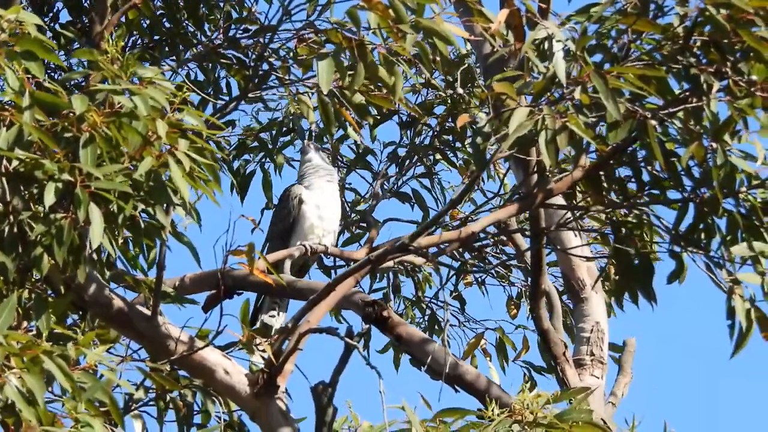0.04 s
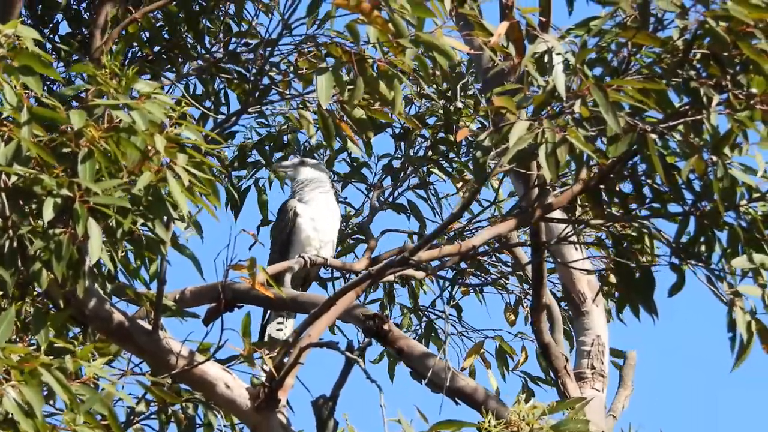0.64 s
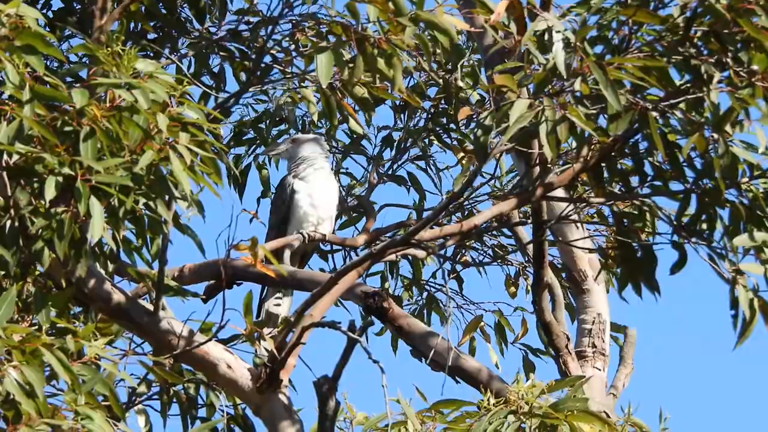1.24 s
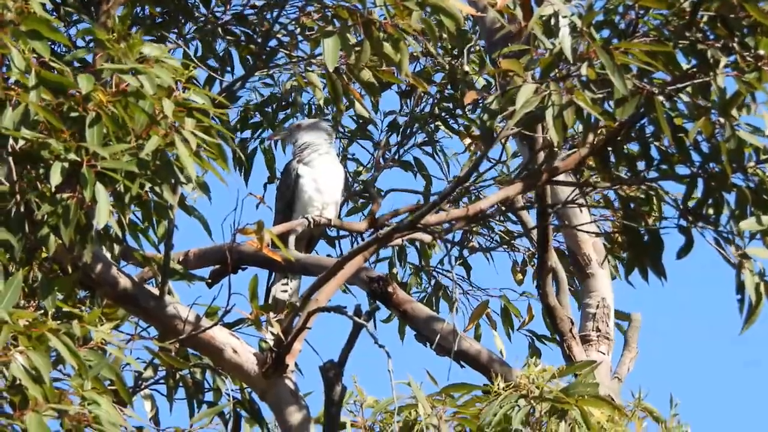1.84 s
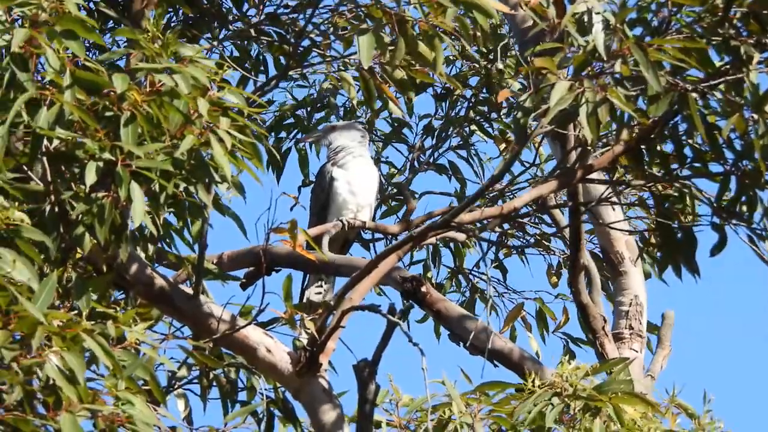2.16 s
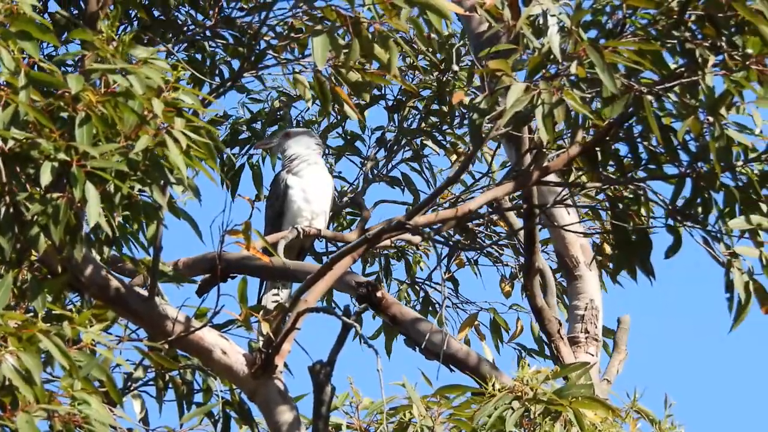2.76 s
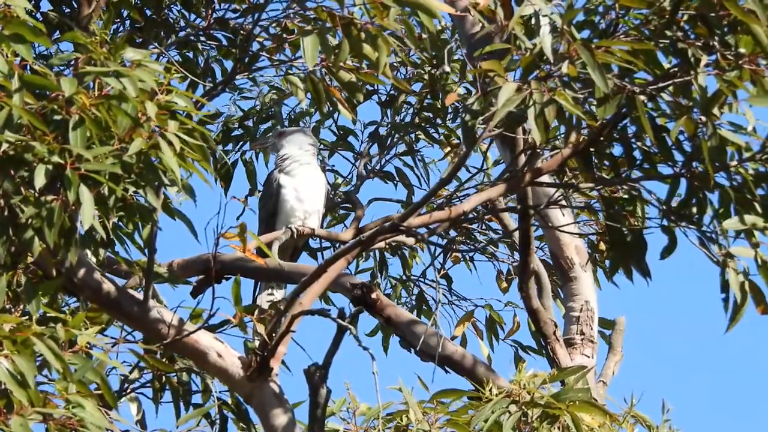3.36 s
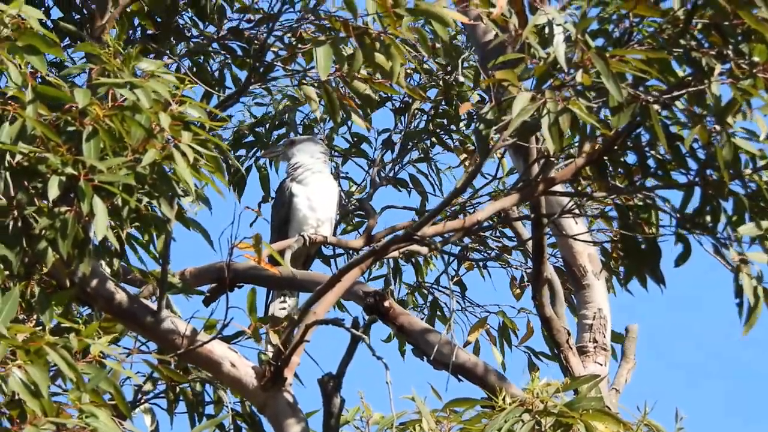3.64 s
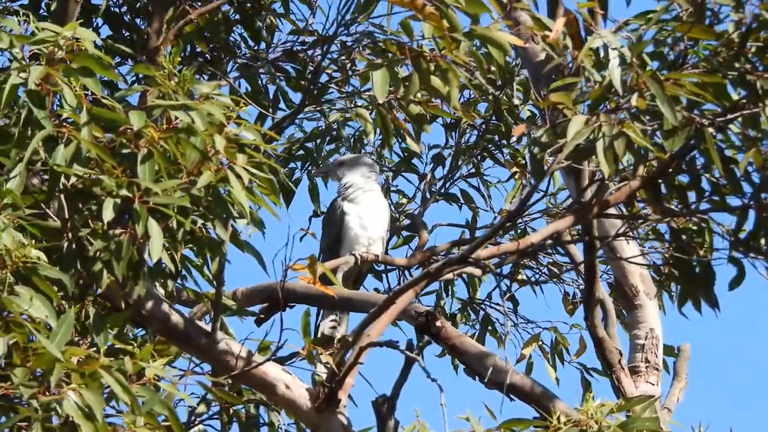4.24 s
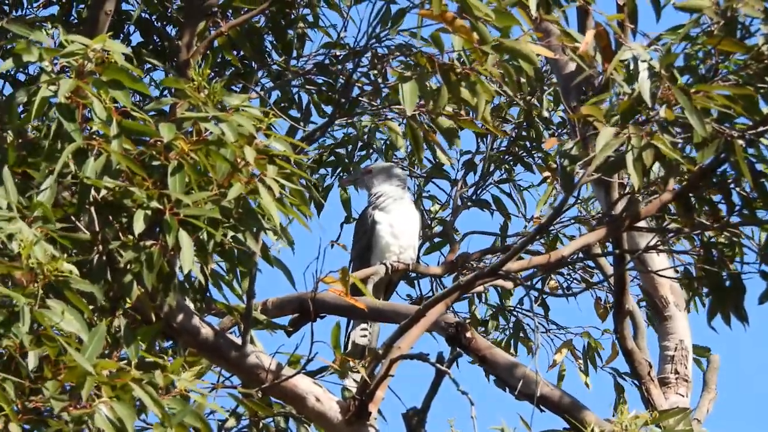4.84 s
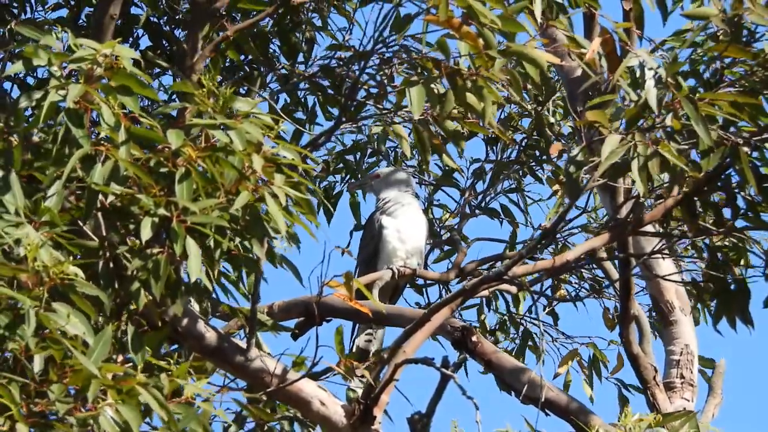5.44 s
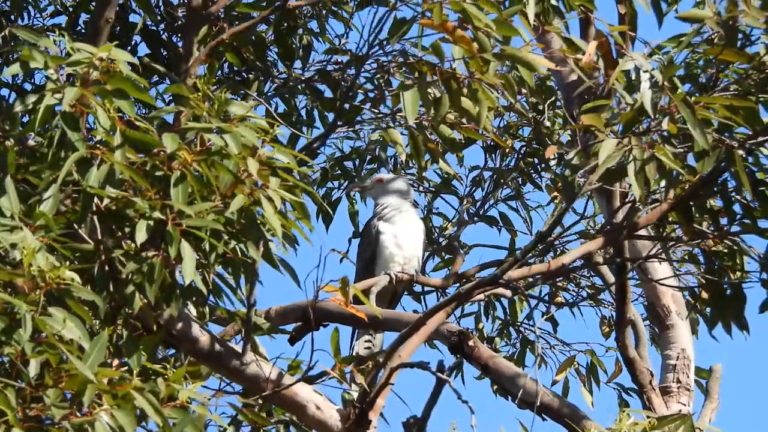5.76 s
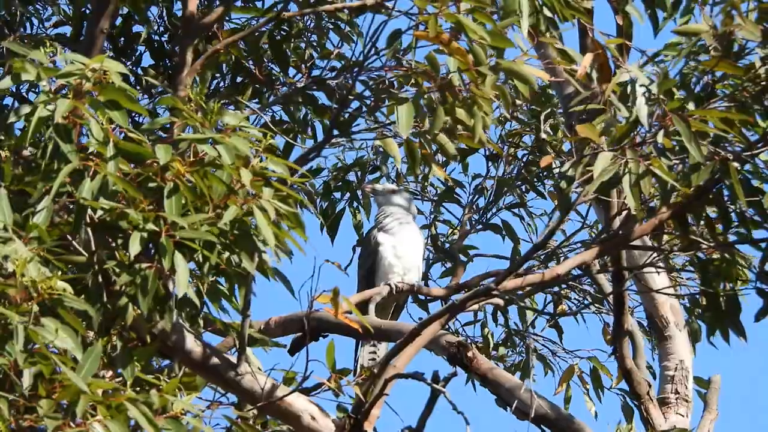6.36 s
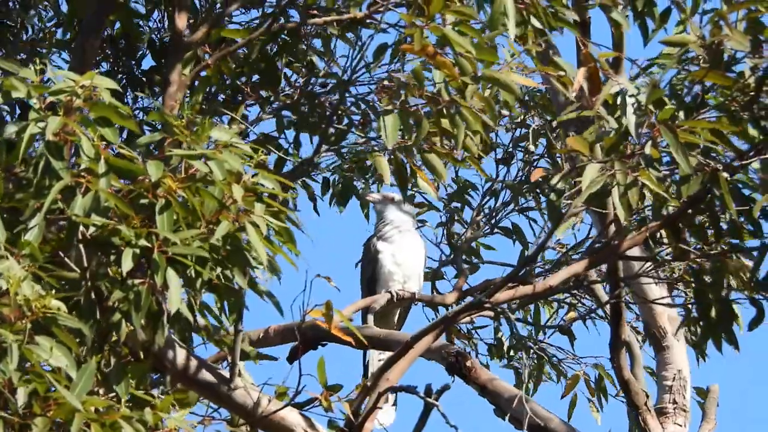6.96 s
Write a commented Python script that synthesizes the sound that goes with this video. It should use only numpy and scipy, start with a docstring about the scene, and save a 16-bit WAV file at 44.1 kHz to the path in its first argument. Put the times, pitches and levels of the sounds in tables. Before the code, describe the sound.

A large cuckoo calls three times from a treetop, loud and a little raspy, its pitch swooping up and down and ringing on through the woods. Before the calls, the hand-held camera clicks four times near the microphone, the last click loudest. Afterwards come barely audible whistles from a far bird and brief leaf rustles. Soft hiss and a low distant rumble run throughout.

```python
"""A large cuckoo high in a tree gives three loud, wavering, slightly hoarse calls; the woods echo each.
Its vibrating membranes make a harmonic tone, and throat resonance lifts the second harmonic far above
the rest. The echo of an earlier call is dying away at the start. The hand-held camera clicks four times,
ringing in its damped modes. Faint knocks, whistles and rustles come and go over a distant rumble, the
hiss of the microphone and a thin electronic whine."""
import sys
import numpy as np
from scipy import signal
from scipy.fft import rfft, irfft
from scipy.io import wavfile
from scipy.ndimage import uniform_filter1d

SR = 44100
rng = np.random.default_rng(int(sys.argv[2]) if len(sys.argv) > 2 else 0)


def transcribe(u):
    """Save the signal u as a 16-bit wav file named by the first command-line argument.

    u: samples, shape (n,) or (channels, n), limited to [-1, 1]; the rate is SR.
    q: integer samples, one column per channel.
    """
    v = np.clip(np.atleast_2d(u).T, -1, 1)
    q = np.round(v * 32767).astype(np.int16)
    wavfile.write(sys.argv[1], SR, q)


N = 313110
TIME = np.arange(N) / SR
BIN_HZ = np.arange(N // 2 + 1) * SR / N
SIDES = np.array([[1], [-1]])  # left, right


def from_db(db):
    """Amplitude ratio: a factor of ten per 20 dB."""
    return 10 ** (np.asarray(db) / 20)


def rms_one(x):
    """Normalisation to unit mean power."""
    return x / np.sqrt(np.mean(x ** 2) + 1e-20)


def at_hz(points, hz):
    """Interpolation on a logarithmic frequency axis."""
    f, value = np.transpose(points)
    return np.interp(np.log(np.maximum(hz, 1)), np.log(f), value)


def band(x, low_hz, high_hz):
    """Causal band-pass filtering."""
    return signal.sosfilt(signal.butter(2, [low_hz, high_hz], "band", fs=SR, output="sos"), x)


def resonate(x, hz, width_hz):
    """Forced response of a damped resonator with unit peak gain."""
    r = np.exp(-np.pi * width_hz / SR)
    feedback = [1, -2 * r * np.cos(2 * np.pi * hz / SR), r * r]
    return signal.lfilter((1 - r * r) / 2 * np.array([1, 0, -1]), feedback, x)


def drift(rate_hz):
    """Random fluctuation: low-pass noise of unit rms."""
    return rms_one(irfft(rfft(rng.standard_normal(N)) / (1 + (BIN_HZ / rate_hz) ** 2), N))


# Likeness of the two microphone ports: f/Hz, correlation (negative counts as 0)
PORT_CORRELATION = [(60, 0.93), (120, 0.95), (240, 0.8), (480, 0.61), (950, 0.69), (1890, 0.28),
                    (3770, 0.12), (7520, 0.045), (15000, -0.97)]

def stereo_noise(spectrum):
    """Partial coherence: coloured noise of unit rms, less alike at the two ports towards the treble."""
    mid, side = rfft(rng.standard_normal((2, N))) * from_db(at_hz(spectrum, BIN_HZ))
    alike = np.clip(at_hz(PORT_CORRELATION, BIN_HZ), 0, 1)
    return rms_one(irfft(np.sqrt(1 + alike) * mid + np.sqrt(1 - alike) * side * SIDES, N))


# Spectral density of the rumble: f/Hz, relative level/dB
RUMBLE_SPECTRUM = [(20, -17), (35, -7.5), (58, 2), (115, -1), (190, -2), (250, -14), (400, -14.5),
                   (630, -18), (900, -16), (1400, -26.5), (2500, -34.5), (5000, -44.5)]

def distant_rumble(level_db=-45.5, sway_db=1.5, pan_db=0.15):
    """Ambient low-frequency noise under random amplitude modulation."""
    return from_db(level_db + sway_db * drift(20) + pan_db * SIDES) * stereo_noise(RUMBLE_SPECTRUM)


# Spectral density of the hiss: f/Hz, relative level/dB
HISS_SPECTRUM = [(500, -7.5), (1600, 1.5), (3200, -0.5), (4400, 2), (6500, 0.5), (8800, 0.5), (10200, -6.5),
                 (12500, -11), (15500, -14)]

def microphone_hiss(level_db=-53.5, pan_db=0.17):
    """Self-noise of the microphone: stationary and broadband."""
    return from_db(level_db + pan_db * SIDES) * stereo_noise(HISS_SPECTRUM)


# Tones of the electronics: f/Hz, rms level/dB
WHINE_TONES = [(10950, -84), (14050, -87)]

def electronic_whine():
    """A line spectrum of two steady sinusoids."""
    return sum(np.sqrt(2) * from_db(db) * np.sin(2 * np.pi * hz * TIME) for hz, db in WHINE_TONES)


def earlier_echo(start_db=-52, t60=1.24):
    """Reverberant decay: the woods have smeared an earlier call's second harmonic into a noise band."""
    wash = rms_one(band(rng.standard_normal(N), 1380, 1620))
    return from_db(start_db - 60 * TIME / t60) * wash


def ring(age, hz, t60):
    """Free vibration of one damped mode, silent before the blow."""
    age = np.maximum(age, 0)
    return np.sin(2 * np.pi * hz * age) * np.exp(-np.minimum(np.log(1000) * age / t60, 20))


def struck(age, modes):
    """Modal superposition in a struck part, with neighbouring modes opposite in sign."""
    return sum((-1) ** k * from_db(db) * ring(age, hz, t60) for k, (hz, db, t60) in enumerate(modes))


# Modes of the knock, the camera body and the latch: f/Hz, relative level/dB, T60/s
SHELL_MODES = [(1010, 2, 0.013), (1287, 5, 0.024), (2064, -3, 0.015), (3250, -8.5, 0.011)]
BODY_MODES = [(114, -0.38, 0.13), (187, -2.2, 0.076)]
LATCH_MODES = [(4460, -6, 0.011), (5050, -1.5, 0.0031), (5730, -2.5, 0.004), (7900, -7.5, 0.0081),
               (8740, -4, 0.0049), (9160, -6, .004), (11500, -20, 0.0018)]
# Impacts in the camera: t/s, knock level/dB, body thump level/dB, latch tick level/dB
CAMERA_IMPACTS = [(0.4956, -47.5, -41, -44), (1.4419, -48.5, -53, -43), (1.6765, -44.5, -32, -39),
                  (1.8854, -26.5, -22, -22)]

def camera_clicks(body_lag_s=0.0013, latch_lag_s=0.0101, knock_pan_db=1.5, tick_pan_db=3.5):
    """Impact excitation: a dull knock shakes the heavy body, then a small latch ticks, left of centre."""
    knock, tick = np.zeros((2, N))
    for s, knock_db, thump_db, tick_db in CAMERA_IMPACTS:
        on = (TIME > s) & (TIME < s + .2)
        age = TIME[on] - s
        knock[on] += from_db(knock_db) * struck(age, SHELL_MODES)
        knock[on] -= from_db(thump_db) * struck(age - body_lag_s, BODY_MODES)
        tick[on] += from_db(tick_db) * struck(age - latch_lag_s, LATCH_MODES)
    return knock * from_db(knock_pan_db * SIDES) + tick * from_db(tick_pan_db * SIDES)


# Distant impacts: t/s, relative level/dB, f/Hz
FAR_IMPACTS = [(1.28, -44.5, 410), (1.367, -40.5, 409), (2.437, -43.5, 570), (2.495, -44.5, 514),
               (5.384, -40.5, 550)]

def far_knocks(gain_db=1.0, t60=0.061):
    """Damped oscillation: each soft knock rings in a single mode."""
    return sum(from_db(db + gain_db) * ring(TIME - s, hz, t60) for s, db, hz in FAR_IMPACTS)


def swoop(t, crest_s, rise_s, fall_s, pointedness=2.4):
    """Modulation contour: a rounded arch, 1 at the crest and 0 outside."""
    away = np.clip(np.maximum((crest_s - t) / rise_s, (t - crest_s) / fall_s), 0, 1)
    return np.abs(np.cos(np.pi / 2 * away)) ** pointedness


# Swoops of the voice: crest t/s, rise/s, fall/s, crest f/Hz, relative tone and rasp levels/dB
PITCH_SWOOPS = [ (3.728, 0.065, 0.027, 790, -42.5, -53), (3.826, .077, .042, 906, -40, -48),
                (3.94, 0.09, .112, 884, -41.5, -52.5), (4.219, .012, 0.0095, 962, -43.5, -53.5),
                (4.261, 0.064, 0.023, 878, -39.5, -51), (4.346, 0.061, 0.05, 862.5, -39, -47),
                (4.433, 0.03, 0.11, 737, -42.5, -55), (4.713, .094, 0.0187, 773, -42, -52.5),
                (4.772, .025, 0.029, 778, -40.5, -51), (4.859, 0.096, 0.04, 848, -42, -53),
                (4.988, 0.087, 0.085, 726, -46.5, -61.5), ]

def gesture(t, attack_s, scoop_hz, rest_hz=646.3, scoop_s=0.029, release_s=0.018, fade_depth_db=15.5,
            full_push_hz_per_s=7600, tone_push_db=3, rasp_push_db=1, sag_db_per_s=30):
    """Frequency and amplitude modulation: pitch/Hz, tone level/dB and rasp level/dB through one call."""
    swoops = np.array([row for row in PITCH_SWOOPS if t[0] < row[0] < t[-1]])
    crests = swoops[:, 0]
    age, remaining = t - t[0], t[-1] - t
    pitch = rest_hz + sum((hz - rest_hz) * swoop(t, s, rise, fall) for s, rise, fall, hz in swoops[:, :4])
    # the bird pushes while a swoop climbs
    push = np.clip(np.gradient(pitch, t) / full_push_hz_per_s, 0, 1)
    pitch -= scoop_hz * np.clip(1 - (age / scoop_s) ** 2, 0, 1)
    fade_db = fade_depth_db * (np.clip(np.minimum(age / attack_s, remaining / release_s), 0, 1) - 1)
    tone_db, rasp_db = [np.interp(t, crests, column) + fade_db for column in swoops.T[4:]]
    sag_db = sag_db_per_s * np.maximum(t - crests[-1], 0)
    return pitch, tone_db + tone_push_db * push, rasp_db + rasp_push_db * push - sag_db


# Throat response: f/Hz, level of the second harmonic over the fundamental/dB
THROAT_RESPONSE = [(1100, 5.5), (1300, 4.5), (1385, 8), (1440, 17), (1520, 19), (1620, 16), (1720, 19),
                   (1820, 13), (1950, 12.5)]

def throat_lift_db(pitch):
    """Resonance lifts the second harmonic once a swoop carries it into the throat's passband."""
    return at_hz(THROAT_RESPONSE, 2 * pitch)


# Resonances of windpipe and bill: f/Hz, bandwidth/Hz, gain/dB
FORMANTS = [(1995, 140, -4.5), (2350, 64, -2.5), (2597, 99, -12.5), (3500, 68, -12), (3950, 15, -8.5),
            (4295, 58, -5.5), (4620, 150, -15.5), (5410, 89, -11.5), (5910, 250, -15), (6460, 110, -11),
            (7660, 55, -14.5), (8580, 140, -14.5)]
# Broad response between them: f/Hz, gain/dB
TRACT_FLOOR = [(1700, -32.5), (2200, -44), (3000, -22), (4500, -28.5), (6500, -27), (8800, -23),
               (10000, -54)]

def vocal_tract(rasp):
    """Source-filter principle: fixed formants colour the overtones that sweep through them."""
    ringing = sum((-1) ** k * from_db(db) * resonate(rasp, hz, width)
                  for k, (hz, width, db) in enumerate(FORMANTS))
    return ringing + irfft(rfft(rasp) * from_db(at_hz(TRACT_FLOOR, BIN_HZ)), N)


# Brief dips in the second harmonic, probably where echoes cancel it: t/s, depth/dB
ECHO_DIPS = [(3.978, 5), (4.219, 7), (4.238, 25), (4.265, 15), (4.794, 9)]

def echo_dips_db(t, width_s=0.0051):
    """Gaussian dips in level at set times, standing for probable destructive interference."""
    return sum(db * np.exp(-((t - s) / width_s) ** 2) for s, db in ECHO_DIPS)


def call(start_s, end_s, attack_s, scoop_hz, jitter=0.0055, shimmer=0.022, growl_db=-1.5,
         snap_jitter=0.0125, flutter_depth=0.8, air_db=-6, rasp_gain_db=7.5, flare_db_per_octave=11):
    """Nearly periodic membrane vibration: two strong harmonics and a rasp of overtones and breath."""
    on = (TIME > start_s) & (TIME < end_s)
    t, count = TIME[on], on.sum()
    pitch, tone_db, rasp_db = gesture(t, attack_s, scoop_hz)
    second_db = tone_db + throat_lift_db(pitch) - echo_dips_db(t)
    pitch *= 1 + jitter * drift(180)[on]
    phase = 2 * np.pi * np.cumsum(pitch) / SR
    gate = np.sqrt(2) * np.clip(np.minimum(t - t[0], t[-1] - t) / .005, 0, 1)
    # a growl rides on the second harmonic and breaks it up wherever it is weak
    second = from_db(second_db) + from_db(tone_db + growl_db) * drift(64)[on]
    tone, rasp = np.zeros((2, N))
    tone[on] = from_db(tone_db) * np.sin(phase) + second * np.sin(2 * phase)
    tone[on] *= gate * (1 + shimmer * drift(130)[on])
    # the membranes snap shut early or late, so the overtones blur; each flutters on its own
    snap = phase + 2 * np.pi * np.cumsum(pitch * snap_jitter * drift(230)[on]) / SR
    flutter = flutter_depth * drift(31)
    overtones = sum((1 + np.roll(flutter, k * count)[on]) * np.sin(k * snap) for k in range(3, 15))
    # air rushes through once a cycle
    air = rms_one(band(rng.standard_normal(count), 2000, 11000) * (1 + np.cos(snap)))
    # tighter membranes snap harder, so the rasp grows with pitch
    force = from_db(rasp_db + rasp_gain_db + flare_db_per_octave * np.log2(pitch / pitch.mean()))
    rasp[on] = force * gate * (overtones + from_db(air_db) * np.std(overtones) * air)
    return tone + vocal_tract(rasp)


# The calls: start t/s, end t/s, attack/s, depth of the opening pitch scoop/Hz
CALLS = [(3.706, 4.03, 0.019, 1), (4.189, 4.504, 0.037, 130.5), (4.686, 5.051, 0.015, 0.5)]

def cuckoo(treble_pan_db=2.0):
    """Superposition of the direct voice, its treble leaning left, and its reflections."""
    voice = sum(call(*row) for row in CALLS)
    lean = band(voice, 3500, 12000) * (from_db(treble_pan_db * SIDES) - 1)
    return voice + lean + woods(voice) + trunk_echoes(voice)


# Reverberation time of the woods: f/Hz, T60/s
TAIL_T60 = [(700, .7), (1300, 1.65), (1800, 1.55), (3000, .9), (9000, .5)]
# Colour of the reverberation: f/Hz, relative band gain/dB
TAIL_COLOUR = [(700, 3.5), (1500, 6.3), (3000, -4), (9000, 20.5)]

def woods(x, leaves_db=-20, leaves_t60=0.12, treble_scatter_db=14,
          tail_db=-18.5, tail_onset_s=0.009, clump_db=8, clump_s=0.23):
    """Scattering: near leaves return the sound at once, mostly its treble; far trunks give a long tail."""
    age = np.arange(int(1.6 * SR)) / SR
    edges_hz = 400 * 2 ** np.arange(0, 5.1, .5)
    response = np.zeros((2, len(age)))
    # the trees stand in clumps, so the tail comes back unevenly at first
    clumps = from_db(clump_db * drift(40)[:len(age)] * np.exp(-age / clump_s))
    for low, high in zip(edges_hz, edges_hz[1:]):
        hz = np.sqrt(low * high)
        treble = np.clip(np.log2(hz / 1700) / 0.34, 0, 1)
        leaves = from_db(-60 * age / leaves_t60) * np.minimum(age / .004, 1)
        leaves *= from_db(leaves_db + treble_scatter_db * treble) / np.linalg.norm(leaves)
        tail = from_db(-60 * age / at_hz(TAIL_T60, hz)) * (1 - np.exp(-age / tail_onset_s)) * clumps
        tail *= from_db(tail_db + at_hz(TAIL_COLOUR, hz)) / np.linalg.norm(tail)
        # short waves reach the two ports differently
        alike = np.clip(.75 - 0.86 * treble, 0, 1)
        mid, side = band(rng.standard_normal((2, len(age))), low, high)
        diffuse = np.sqrt((1 + alike) / 2) * mid + np.sqrt((1 - alike) / 2) * side * SIDES
        response += np.hypot(leaves, tail) * diffuse
    return signal.fftconvolve(x[None], response, axes=1)[:, :N]


# Reflections from single trunks and crowns: delay/s, gain/dB
REFLECTIONS = [(0.026, -13.5), (0.065, -21.5), (0.103, -22), (.155, -35.5), (.207, -28.5)]

def trunk_echoes(x):
    """Discrete reflection: a few dull, delayed copies make the tail flutter."""
    dull = band(x, 770, 3000)
    return sum(from_db(db) * np.interp(TIME - delay, TIME, dull, left=0) for delay, db in REFLECTIONS)


# Notes of a far bird: centre t/s, duration/s, f/Hz, peak level/dB
WHISTLE_NOTES = [(5.48, .08, 2930, -62), (5.565, .07, 2930, -63), (6.58, .14, 2600, -65)]

def far_whistles(waver=0.0053):
    """Pure tones with slight random frequency modulation, each under a parabolic envelope."""
    phase_per_hz = 2 * np.pi * np.cumsum(1 + waver * drift(44)) / SR
    return sum(from_db(db) * np.clip(1 - (2 * (TIME - s) / length) ** 2, 0, 1) * np.sin(hz * phase_per_hz)
               for s, length, hz, db in WHISTLE_NOTES)


# Faint rustles: centre t/s, level/dB, half-width/s
RUSTLE_SWELLS = [(5.724, -48.5, 0.012), (6.232, -49.5, .01), (6.73, -51.5, 0.026)]

def rustles():
    """Amplitude modulation of a high noise band by brief swells."""
    swell = sum(from_db(db) / (1 + ((TIME - s) / width) ** 2) for s, db, width in RUSTLE_SWELLS)
    return swell * rms_one(band(rng.standard_normal((2, N)), 6400, 9000))


def scene():
    """Linear superposition of the bird, the camera and the quiet around them."""
    events = cuckoo() + camera_clicks() + far_knocks() + far_whistles() + rustles()
    return events + distant_rumble() + microphone_hiss() + electronic_whine() + earlier_echo()


def duck(x, threshold_db=-42, slope=0.5, deepest_db=6, release_db_per_s=45):
    """Band compression: the recorder turns the low mids down in loud sound and lets them back slowly."""
    power = uniform_filter1d(band(x.mean(0), 1000, 3000) ** 2, size=1500)
    level_db = 10 * np.log10(np.abs(power) + 1e-12)
    release_db = release_db_per_s * TIME
    held_db = np.maximum.accumulate(level_db + release_db) - release_db
    cut_db = np.clip(slope * (held_db - threshold_db), 0, deepest_db)
    return x + (from_db(-cut_db) - 1) * resonate(x, hz=360, width_hz=260)


def record(dry, cutoff_hz=15750):
    """Band limiting: a steep low-pass follows the ducking of the low mids."""
    return signal.sosfilt(signal.ellip(12, .1, 90, cutoff_hz, fs=SR, output="sos"), duck(dry))


dry = scene()
out = record(dry)
transcribe(out)
```